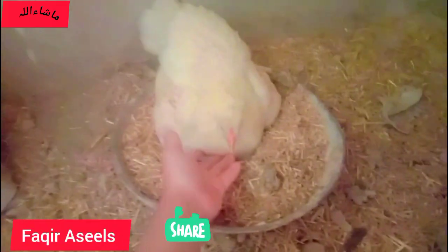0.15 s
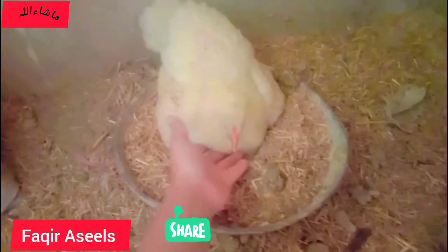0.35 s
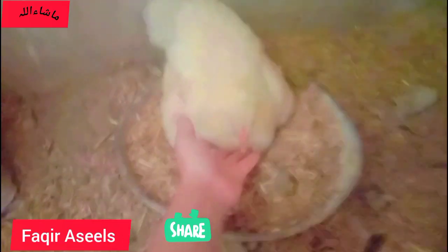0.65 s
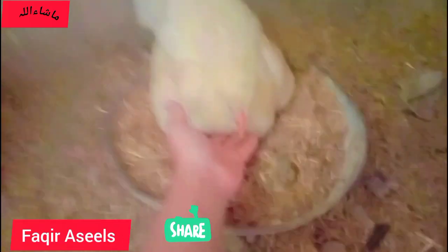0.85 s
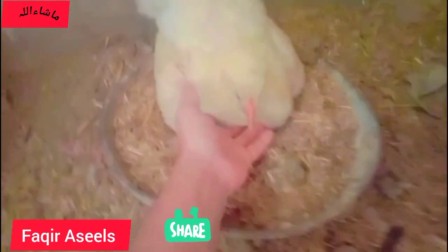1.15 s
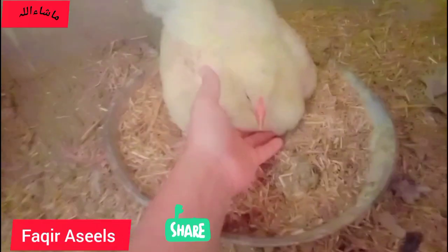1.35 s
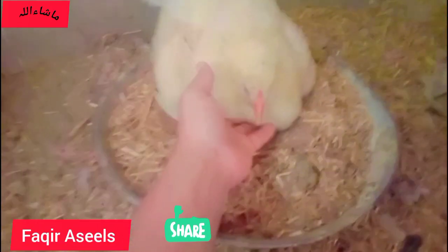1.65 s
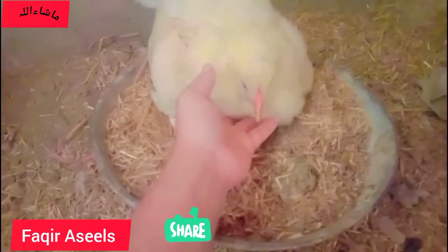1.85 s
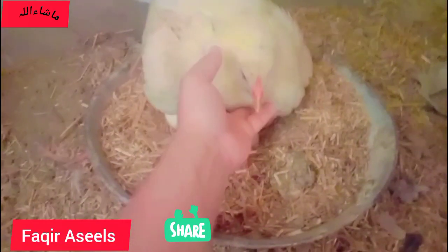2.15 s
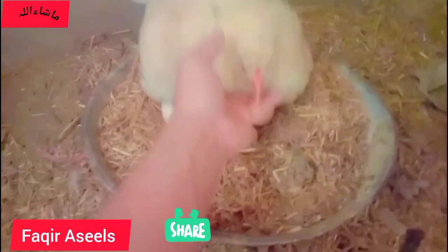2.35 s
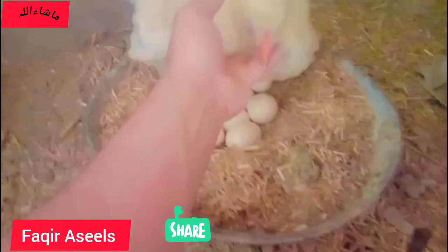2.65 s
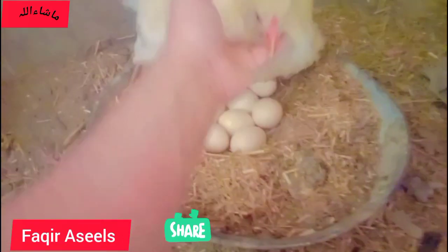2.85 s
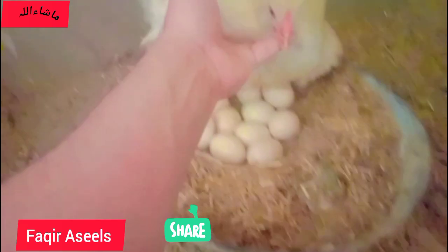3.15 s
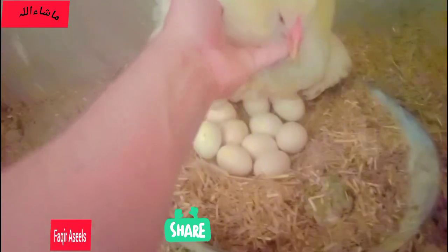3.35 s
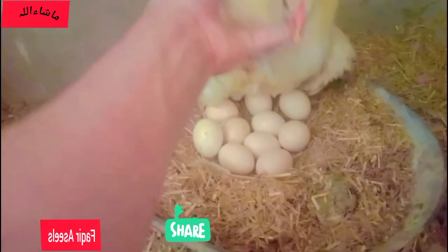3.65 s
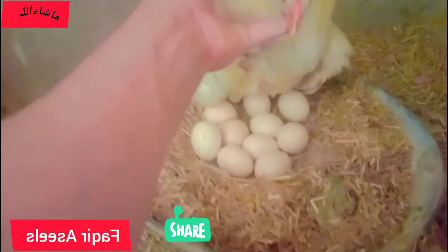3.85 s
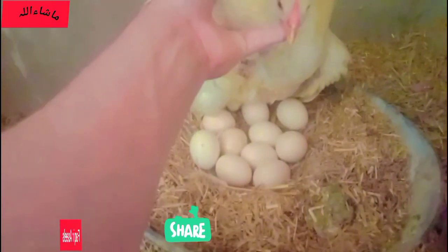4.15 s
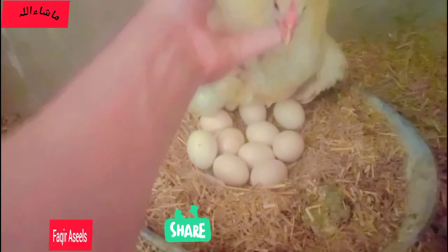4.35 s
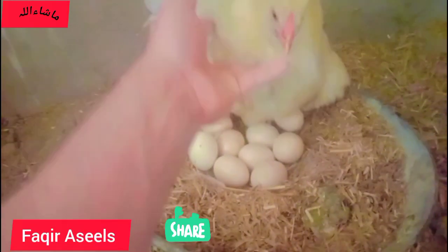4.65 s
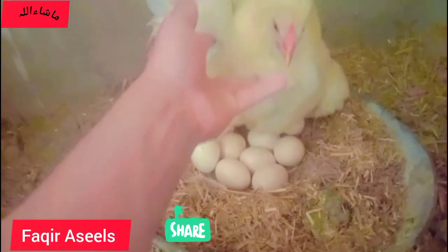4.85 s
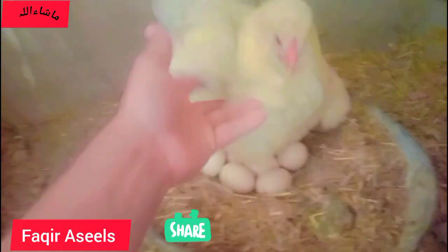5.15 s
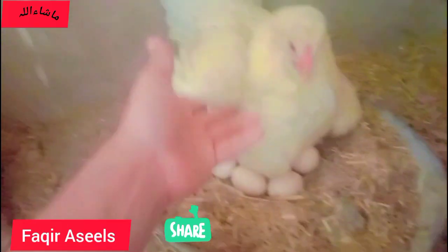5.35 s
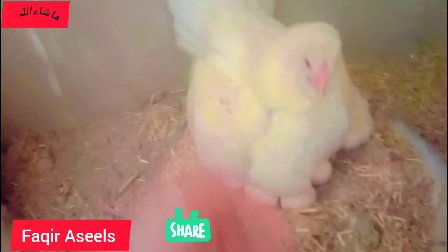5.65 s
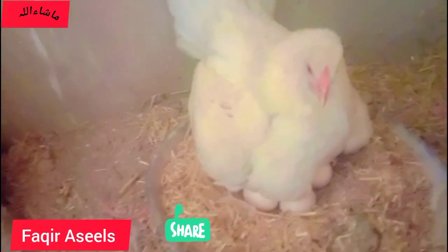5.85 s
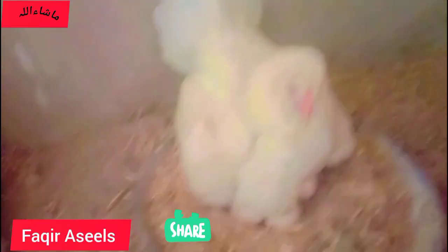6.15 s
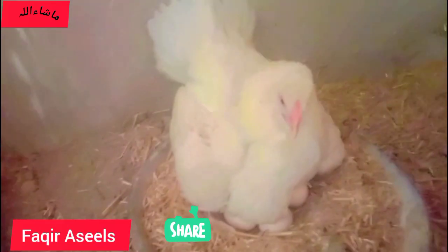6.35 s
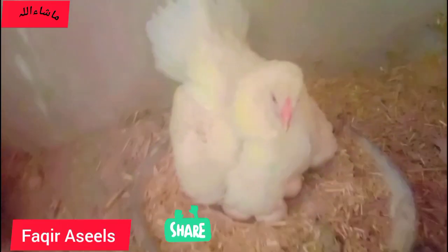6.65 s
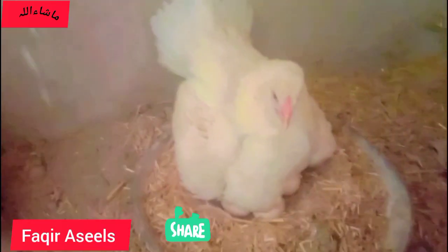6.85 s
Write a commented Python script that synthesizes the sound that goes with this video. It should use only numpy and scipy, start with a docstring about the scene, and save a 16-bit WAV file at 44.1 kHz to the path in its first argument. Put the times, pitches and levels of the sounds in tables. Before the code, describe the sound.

A broody hen close up squawks harshly and rattles off clucks over rustling straw, calms to soft single clucks, then lets out a rising hoarse screech.

```python
"""Broody hen in a small coop

A hen close to the microphone scolds a hand reaching under her: harsh squawks, rattling bursts of clucks,
single soft clucks, hoarse whistles, a low growl and at last a swelling, hissing screech. Her voice is rough
pulses and trembling tones in resonances of throat, chest and beak. Straw rustling, feathers and claws are
shaped noise, bumps on the nest decaying sines; small birds, faint gliding tones, cheep further off."""
import sys
import numpy as np
from scipy import signal
from scipy.fft import rfft, irfft, next_fast_len
from scipy.io import wavfile
from scipy.ndimage import uniform_filter1d, map_coordinates

SR = 44100
rng = np.random.default_rng(int(sys.argv[2]) if len(sys.argv) > 2 else 0)


def inscribe(sig):
    """Save sig as 16-bit PCM at rate SR to the path in sys.argv[1].

    A 1-D sig is mono; a 2-D sig holds one channel per row.
    Samples are clipped to [-1, 1] before scaling.
    """
    pcm = np.round(np.clip(np.atleast_2d(sig).T, -1, 1) * 32767)
    wavfile.write(sys.argv[1], SR, pcm.astype(np.int16))


N = 308391
TIME = np.arange(N) / SR  # s

# Straw under the hand. Loose stalks rub while the hand is under the hen: (t/s, level/dB)
STALKS = [(0, -77), (.3, -53.5), (1.2, -57), (2.6, -56), (3.3, -70), (3.8, -63.5), (4.1, -73.5),
          (4.6, -71.5), (5.1, -64), (5.6, -70), (6.1, -58.5)]
# Strokes through the straw, each a rounded swell: (t/s at its peak, length/s, level/dB)
STROKES = [(0.142, 0.9, -51), (.44, 0.27, -52.5), (0.696, 0.16, -51.5), (1.072, 0.16, -49),
           (1.281, 0.17, -49), (1.443, 0.22, -50), (1.629, 0.16, -53), (1.796, 0.21, -52),
           (1.983, 0.2, -55), (2.28, 0.22, -53.5), (2.469, 0.25, -50), (2.652, 0.3, -53),
           (2.868, 0.24, -54), (3.066, 0.18, -55.5), (3.23, 0.2, -56), (3.462, 0.22, -57),
           (4.93, 0.12, -57.5)]
# Colours of the rubbing stalks and of the brighter rustle: (f/Hz, gain/dB)
STALK_COLOUR = [(500, -25.5), (1500, -2), (2300, -0.5), (3000, 6.5), (3600, 1.5), (4200, -30),
                (7000, -26.5), (8500, -48.5)]
STRAW_COLOUR = [(200, -20), (600, -12.5), (1400, -12), (3200, 7), (4300, -6.5), (5700, 1), (6700, -9),
                (7500, -34.5), (8500, -47), (12000, -33), (16000, -59.5)]
STALK_HISS_DB = -7  # the stalks' brighter hiss against their rubbing

# Low rumble as the arm moves: (t/s, level/dB), and its colour: (f/Hz, gain/dB)
RUMBLE = [(0, -87), (.9, -65.5), (2.9, -67), (3.3, -81.5), (6.99, -70)]
RUMBLE_COLOUR = [(25, -28), (55, 0.5), (90, -5.0), (200, -22.0), (600, -54)]
# Colours of the uneven background air and of a steady treble hiss: (f/Hz, gain/dB)
AIR = [(25, -20), (55, -6), (130, -2), (230, -3.5), (450, -21), (1000, -6.5), (3000, -12), (5500, -15.5),
       (8500, -54.5)]
HISS = [(7000, -34), (11500, -27), (13800, -12), (14500, -2.5), (15500, -5)]

# Harsh clucks, most in rattling bursts: (t/s, length/s, level/dB, pitch f/Hz, throat resonance f/Hz)
HARSH_CLUCKS = [(0.028, 0.016, -22.5, 217.3, 1099), (0.248, 0.026, -35, 427, 840),
                (0.313, 0.038, -32.5, 398.6, 846), (0.362, 0.031, -27.5, 392.7, 830),
                (0.421, 0.034, -26, 390.8, 822), (0.956, 0.026, -30.5, 244.2, 960),
                (1.197, 0.021, -22.5, 233.2, 974), (1.257, 0.018, -19.5, 305.6, 927),
                (1.273, 0.018, -26.5, 279.2, 880), (1.301, 0.019, -19.5, 304, 919),
                (1.321, 0.0093, -18, 314, 910), (1.358, .028, -25, 260.7, 834),
                (1.405, 0.034, -27, 260.6, 840), (1.466, 0.02, -33.5, 375, 880),
                (1.505, 0.028, -32.5, 379, 795), (1.551, .026, -30.5, 241.8, 930),
                (1.88, 0.025, -31.5, 433.3, 928), (2.141, 0.023, -31.5, 217.8, 894),
                (2.188, 0.018, -44, 399, 1100), (2.278, 0.028, -30.5, 224.6, 974),
                (2.335, 0.024, -29, 261.4, 860), (2.384, .017, -20.5, 335.5, 965),
                (2.426, 0.034, -27, 288.8, 860), (2.49, 0.029, -29, 346.4, 757),
                (2.526, 0.027, -28.5, 346.6, 810), (2.813, 0.028, -30, 382.4, 867)]
# Single soft clucks, mostly lower as the hen calms down:
# (t/s, length/s, level/dB, pitch f/Hz, throat resonance f/Hz, roughness 0-1)
SOFT_CLUCKS = [(3.161, 0.021, -37, 398.7, 760, 0.35), (3.46, 0.023, -36, 395.4, 746, 0.34),
               (3.816, .017, -32, 382, 764, 0.25), (4.276, 0.013, -33.5, 344, 690, 0.34),
               (4.563, 0.018, -31, 363.3, 720, 0.15), (4.989, 0.011, -31.5, 334.5, 663, 0.32),
               (5.333, 0.01, -34, 335, 687, 0.47), (5.697, .013, -29, 350, 705, 0.19),
               (6.442, 0.014, -37.5, 334, 680, 0.32), (6.819, 0.012, -33.5, 348, 700, 0.54)]
# Colour of the throat in a cluck, and of the chest: (f/Hz, gain/dB)
CLUCK_COLOUR = [(60, -52), (270, -32), (420, -3.5), (600, 4), (1000, 1.5), (1200, 2), (1390, -5), (1620, 4),
                (1900, 1.5), (2300, 11.5), (3500, 7), (4200, -18), (5200, -7), (7000, -27)]
CHEST_COLOUR = [(50, -46.5), (220, -14), (420, -4.5), (800, -9.5), (2000, -26.0)]
CLEAN_S, ROUGH_PER_S = .0105, 27  # a longer harsh push is rougher: roughness per s beyond the clean length
CHEST_DB, CHEST_FOLLOWS = -41, 0.085  # chest level at a -32 dB harsh cluck; dB per dB of throat level
SOFT_CHEST_DB, CHEST_DB_PER_HZ = -9, 0.11  # soft cluck's chest against its throat at 380 Hz; weaker below
HARSH_BEAK_DB = -20.5  # the beak's ring against the throat
SOFT_BEAK_DB, BEAK_DB_PER_HZ = -16, 0.4364  # the same at 380 Hz; the beak shuts as the pitch sinks
SAC_DB, SAC_HZ, SAC_FADE_DB_PER_HZ = 1, 231, 0.47  # air sac against the chest; fades away from its own pitch
KNOCK_DB, KNOCK_S = -10.5, 0.0024  # bright start against the beak's ring; its decay time to 1/e
HARSH_RISE_SHARE, SOFT_RISE_SHARE = 0.44, 0.43  # share of a cluck's length spent swelling
PITCH_SINK, HARSH_THROAT_SINK, SOFT_THROAT_SINK = .12, 0.025, 0.1  # shares lost over one cluck
LOCK_FROM_DB, LOCK_PER_DB = -26.5, -0.02  # pure-tone share grows below this level (share per dB)

# Squawks: (t/s, length/s, level/dB, throat resonance f/Hz,
# then against the throat: cry level/dB, open-beak level/dB, chest level/dB)
SQUAWKS = [(.172, .045, -35.5, 1321, 0.5, -5, -29), (.487, .047, -27.5, 1352, -0.5, -2.5, -11.5),
           (.544, .045, -38, 1173, 5.5, -6.5, -6), (.622, 0.032, -34, 1269, -1.5, -8.5, -15.5),
           (.692, .024, -41.5, 1268, 1.5, -13, -21.5), (0.756, .033, -34.5, 1255, -8, -13.5, -23),
           (.806, 0.035, -37, 1252, -3.5, -12, -18.5), (.966, .026, -33, 1390, -9.5, -8, -17),
           (1.024, .028, -31, 1329, -4.5, -6, -23.5), (1.096, 0.038, -40.5, 1250, -0.5, -14, -20),
           (1.156, .032, -40, 1173, 0.5, -10.5, -7.5), (6.119, .046, -25.5, 1510, -6.5, -3, -47.5)]
# Colours of the beak and of the open throat: (f/Hz, gain/dB)
BEAK = [(1200, -40.5), (1750, -10), (2100, -1), (2600, -6), (2900, -3), (3400, -2), (3650, -2.5),
        (4000, -27), (5000, -23.5), (6800, -49.5), (8000, -71)]
THROAT_BAND = [(350, -41.5), (600, -8.5), (800, 6), (1600, 10.5), (2400, -16.5), (4000, -7.5),
               (7000, -47.5)]
SQUAWK_RISE_S, SQUAWK_FALL_S = .014, .03
THROAT_CLOSE_SINK, CRY_SINK = 0.081, .13  # shares of their pitch lost over one squawk
THROAT_SWELL_DB, CRY_SWELL_DB, BEAK_SWELL_DB = 8, 3.5, -10  # change over one squawk as the beak closes
CRY_BASE_HZ, CRY_FOLLOWS = 298, .36  # the cry rises with the throat resonance (Hz per Hz)

# The tight throat whistles as a squawk lets go:
# (t/s at its peak, length/s, level/dB, pitch f/Hz, octave level/dB against the tone)
WHISTLES = [(0.222, .03, -36, 1300, -22.5), (0.6, 0.024, -30, 1272, -19), (0.66, .022, -35, 1280, -24),
            (0.73, 0.027, -32.5, 1215, -25), (.918, .056, -31, 1486, -7.5),
            (0.994, .028, -27.5, 1309, -13.5), (1.056, 0.025, -24, 1300, -25.5),
            (1.126, .026, -35, 1229, -26.5), (1.185, 0.033, -33.5, 1145, -25)]
WHISTLE_SINK_PER_S = .7  # share of its pitch lost a second
WHISTLE_WAVER, WHISTLE_FLUTTER_DB = .028, 3.5  # share of the pitch; swing of the level
WHISTLE_HOARSE = .3  # share of the power that is air

# Soft bumps on the nest: (t/s, level/dB, pitch f/Hz)
BUMPS = [(0.958, -33, 188), (2.831, -24, 108.5), (4.379, -35.5, 142.2), (5.025, -34, 160),
         (6.642, -39.5, 120)]

# Small birds further off: (t/s, level/dB before the room in the third column):
# (t/s, length/s, level/dB, start f/Hz, end f/Hz)
CHEEPS = [(1.84, 0.099, -51, 2554, 2790), (1.917, .14, -53.5, 3366, 2994), (4.78, .07, -56.5, 2470, 2616),
          (4.832, 0.072, -57, 3127, 3160), (5.799, .11, -59.5, 3290, 2990)]
CHEEP_WAVER, CHEEP_FLUTTER_DB = .06, 4  # share of the pitch; swing of the level

# Low growl: (t/s, level/dB, pitch f/Hz, hoarse overtones' level/dB against the moan)
GRUMBLE = [(5.045, -61, 300, 6), (5.07, -53.5, 295, 3.5), (5.15, -54.5, 270, -1), (5.21, -47, 238.6, -14.5),
           (5.26, -65.5, 236, -6)]
# Colour of its hoarse overtones: (f/Hz, gain/dB)
GRUMBLE_COLOUR = [(200, -26), (450, -7.5), (650, -2.5), (1150, 2), (1500, -14), (3000, -7), (5000, -55.5)]
THROB_HZ, THROB_START_DB = 31, 10  # throb rate; its swing at the start, dying away by the end

# Colour of feathers on the nest: (f/Hz, gain/dB)
BRUSH_COLOUR = [(60, -43), (210, -6), (500, -13), (800, -8.5), (1350, -8.5), (2300, -23.5), (3700, -16.5),
                (4600, -50), (8000, -72)]
BRUSH_AT_S, BRUSH_DB, BRUSH_ATTACK_S, BRUSH_HOLD_S, BRUSH_FADE_DB_PER_S = 5.264, -50.5, 0.011, 0.084, 81

# Straws snap: (t/s, peak level/dB), and the colour of a snap: (f/Hz, gain/dB)
SNAPS = [(5.277, -51), (5.979, -26)]
SNAP_COLOUR = [(200, -13.0), (1500, 11.5), (3500, 7.5), (6500, -12.0), (8500, -36.5)]

# Claws scratch in the nest basin: (t/s, level/dB)
SCRATCHES = [(5.278, -44), (5.296, -44), (5.311, -40.5), (5.357, -47), (5.408, -53)]
# Resonances of the basin: (f/Hz, level/dB)
BASIN = [(230, 3), (500, 4.5), (780, -1), (1060, 1), (1390, -1)]
BASIN_WIDTH_HZ, SCRATCH_T60_S = 72, 0.018

# Screech: (t/s, throat level/dB, throat resonance f/Hz,
# beak cavity level/dB, beak ring level/dB, broad rasp level/dB)
SCREECH = [(6.18, -40, 1388, -50, -50, -48), (6.22, -38, 1330, -58, -62, -55),
           (6.28, -40.5, 1404, -55.5, -48, -52), (6.43, -45, 1494, -37.5, -40, -44),
           (6.485, -42.5, 1490, -37.5, -34.5, -54), (6.53, -37.5, 1505, -46, -42, -51),
           (6.6, -35.5, 1497, -46, -43.5, -48), (6.67, -39.5, 1489, -47, -39.5, -41.5),
           (6.82, -32, 1510, -36.5, -29, -35), (6.92, -25.5, 1503, -47, -34.5, -34.5),
           (6.99, -26, 1396, -42, -35, -53)]
# The beak's cavity moves during the screech: (t/s, resonance f/Hz)
GAPE = [(6.3, 1840), (6.41, 1990), (6.48, 1680), (6.56, 1596), (6.68, 1825), (6.99, 1735)]
# Rings of the beak: (f/Hz, width/Hz, level/dB)
BEAK_RINGS = [(3200, 203, 3), (3460, 78, -8)]
GAPE_WIDTH_HZ, SCREECH_WIDTH_HZ = 290, 210
SCREECH_GRAIN_DB, WHISTLE_SHARE = 2.2, .25  # swing of the level; share of pure tone in the throat
CRY_DB, SCREECH_LOW_HZ = -6.5, 660  # low cry against the broad rasp; the screech thins out below this

# Decay of the small room: (f/Hz, t60/s)
COOP = [(200, 0.53), (750, 0.22), (3000, 0.51), (8000, 0.12)]
# Early reflections from the coop walls: (delay t/s, level/dB)
WALLS = [(.0065, -23), (0.0127, -15.5), (0.0225, -13.5)]
LOW_CUT_HZ, TOP_HZ = 56, 15600  # the microphone's bass corner; the recorder's band limit


def amp(db):
    """Amplitude factor of a level in dB."""
    return 10 ** (np.asarray(db) / 20)


def unit(x):
    """Scale to rms 1."""
    return x / np.sqrt(np.mean(x ** 2) + 1e-20)


def over(x, length):
    """Scale a call to rms 1 over its length."""
    return x / np.sqrt(np.sum(x ** 2) / (length * SR) + 1e-20)


def along(points, hz):
    """Read (f/Hz, value) points on a log axis."""
    f, v = np.transpose(points)
    return np.interp(np.log(hz + 1), np.log(f + 1), v)


def curves(rows, t=TIME):
    """One value per sample for each column after the time."""
    s, *cols = np.transpose(rows)
    return [np.interp(t, s, c) for c in cols]


def wobble(rate, n):
    """A smooth random curve, rate knots a second."""
    knots = rng.standard_normal(int(n * rate / SR) + 4)
    return map_coordinates(knots, [np.arange(n) * rate / SR])


def add(track, s, x):
    """Mix x into the track at time s."""
    i = max(round(s * SR), 0)
    track[i:i + len(x)] += x[:max(N - i, 0)]


def swell(t, length, rise, fall):
    """Soft gate that opens at 0 and is shut at length."""
    ramp = np.minimum(t / rise, (length - t) / fall)
    return np.sin(np.pi / 2 * np.clip(ramp, 0, 1)) ** 2


def colour(x, points):
    """Causal minimum-phase filter with a (f/Hz, gain/dB) curve, made by folding its cepstrum."""
    m = 2 * next_fast_len(len(x) // 2 + 2048)
    gain_db = along(points, np.fft.rfftfreq(m, 1 / SR))
    cepstrum = irfft(np.log(amp(gain_db)))
    cepstrum[1:m // 2] *= 2
    cepstrum[m // 2 + 1:] = 0
    return irfft(rfft(x, m) * np.exp(rfft(cepstrum)))[:len(x)]


def patchy(x, depth_db, size=5):
    """Small patches of the spectrum swell and fade on their own."""
    z = signal.stft(x, nperseg=512)[2]
    field = rng.standard_normal(z.shape)
    for _ in range(2):
        field = uniform_filter1d(field, size=size // 2, axis=0)
        field = uniform_filter1d(field, size=2 * size, axis=1)
    return signal.istft(z * amp(depth_db * unit(field)), nperseg=512)[1][:len(x)]


def noise(points):
    """Uneven coloured noise of rms 1."""
    return unit(colour(patchy(rng.standard_normal(N), depth_db=2.6), points))


def tone(hz, waver, rate):
    """Phase of an oscillation whose pitch trembles at random."""
    return 2 * np.pi * np.cumsum(hz * (1 + waver * wobble(rate, len(hz)))) / SR


def resonance(x, hz, width_hz):
    """A one-pole resonance whose centre may move: shift down, smooth, shift back up."""
    turn = np.exp(2j * np.pi * np.cumsum(hz * np.ones(len(x))) / SR)
    ring = signal.lfilter([1], [1, -np.exp(-np.pi * width_hz / SR)], x / turn)
    return (turn * ring).imag


def peak(x, hz, width_hz):
    """A resonance with steep skirts, at rms 1."""
    return unit(resonance(resonance(x, hz, width_hz), hz, 2 * width_hz))


def syrinx(pitch_hz, rough, jitter=0.32, scatter_db=4, air=1.0):
    """Pulses of the membranes; roughness upsets their timing and size and lets air rush through."""
    n = len(pitch_hz)
    cycle = np.cumsum(pitch_hz * np.exp(jitter * rough * wobble(300, n))) / SR
    pulses = np.diff(np.floor(cycle), prepend=0) * amp(scatter_db * rough * wobble(250, n))
    rush = rng.standard_normal(n) * np.exp(-2 * (cycle % 1))  # strongest just after each pulse
    return unit(pulses - pulses.mean()) + air * rough * unit(rush)


def straw():
    """Stalks rub as coloured noise; each stroke of the hand swells into a brighter rustle."""
    rubbing = amp(curves(STALKS)[0])
    strokes = sum(amp(db) * np.exp(-(3.28 * (TIME - s) / length) ** 2) for s, length, db in STROKES)
    rustle_level = np.hypot(strokes, amp(STALK_HISS_DB) * rubbing)
    rustle = rustle_level * amp(1.2 * wobble(120, N)) * noise(STRAW_COLOUR)
    unsteady_db = 2.6 * wobble(70, N) + 0.79 * wobble(10, N)
    return rustle + rubbing * amp(unsteady_db) * noise(STALK_COLOUR)


def arm_rumble():
    """Low noise that follows the moving arm."""
    return amp(curves(RUMBLE)[0]) * noise(RUMBLE_COLOUR)


def background():
    """Slowly wavering air in the coop, with a steady treble hiss."""
    air = amp(-68.5 + wobble(1.5, N)) * noise(AIR)
    return air + amp(-68) * unit(colour(rng.standard_normal(N), HISS))


def cluck(length, db, pitch_hz, throat_hz, rough, chest_db, beak_db, rise_share, throat_sink):
    """A short train of pulses rings throat, chest and beak; pitch and throat sink as the push ends."""
    t = np.arange(int((length + .03) * SR)) / SR
    sink = .5 - np.clip(t / length, 0, 1)
    gate = swell(t, length + .0028, rise=rise_share * length, fall=0.0027)
    push = syrinx(pitch_hz * (1 + PITCH_SINK * sink), rough) * gate
    # throat: ringing pulses, part of them replaced by a pure tone
    bent_hz = throat_hz * (1 + throat_sink * sink)
    ring = resonance(push, bent_hz, 110 + 200 * rough)
    pulsed = colour(resonance(ring, throat_hz * 1.503, 900), CLUCK_COLOUR)
    core_gate = swell(t - .002, length + .003, rise=length / 2, fall=length / 2)
    core = np.sin(tone(bent_hz, waver=0.014, rate=420)) * core_gate
    locked = np.clip(LOCK_PER_DB * (db - LOCK_FROM_DB), 0, .7)
    throat = np.sqrt(1 - locked) * unit(pulsed) + np.sqrt(locked) * unit(core)
    # chest: the body and its air sac
    sac_db = SAC_DB - SAC_FADE_DB_PER_HZ * abs(pitch_hz - SAC_HZ)
    body = colour(resonance(push, 415, 50), CHEST_COLOUR)
    chest = unit(body) + amp(sac_db) * peak(push, SAC_HZ, 79)
    beak = resonance(resonance(push, 1180, 350), 1180, 620)
    # the beak is wide open at the start and lets a brighter knock out
    knock = resonance(resonance(push * np.exp(-t / KNOCK_S), 1400, 660), 1300, 640)
    bill = over(beak, length) + amp(KNOCK_DB) * over(knock, length)
    voice = over(throat, length) + amp(beak_db) * bill
    return amp(db) * voice + amp(chest_db) * over(chest, length)


def clucks():
    """Harsh clucks grow rougher with their length; in soft ones the throat, near the octave of the pitch, bends
    down a little."""
    out = np.zeros(N)
    for s, length, db, pitch_hz, throat_hz in HARSH_CLUCKS:
        rough = np.clip(ROUGH_PER_S * (length - CLEAN_S), .2, .7)
        chest_db = CHEST_DB + CHEST_FOLLOWS * (db + 32.0)
        call = cluck(length, db, pitch_hz, throat_hz, rough, chest_db,
                     HARSH_BEAK_DB, HARSH_RISE_SHARE, HARSH_THROAT_SINK)
        add(out, s - .001, call)
    for s, length, db, pitch_hz, throat_hz, rough in SOFT_CLUCKS:
        beak_db = SOFT_BEAK_DB + BEAK_DB_PER_HZ * (pitch_hz - 380)
        chest_db = db + SOFT_CHEST_DB + CHEST_DB_PER_HZ * (pitch_hz - 380)
        call = cluck(length, db, pitch_hz, throat_hz, rough, chest_db,
                     beak_db, SOFT_RISE_SHARE, SOFT_THROAT_SINK)
        add(out, s - .001, call)
    return out


def rasp(push, gate, hz, width_hz, pure):
    """One voice of the open throat: rough pulses in a resonance, and a share (pure) of trembling tone."""
    clean = np.sin(tone(hz, waver=.024, rate=280)) * amp(4 * wobble(200, len(push)))
    harsh = colour(resonance(push * gate, hz, width_hz), THROAT_BAND)
    return np.sqrt(pure) * unit(clean * gate) + np.sqrt(1 - pure) * unit(harsh)


def squawks():
    """Hard, chaotic pulses with the beak flung open; the sound sinks and darkens as it closes."""
    out = np.zeros(N)
    for s, length, db, throat_hz, cry_db, beak_db, chest_db in SQUAWKS:
        t = np.arange(int((length + .04) * SR)) / SR
        closing = np.clip(t / length, 0, 1) - .5
        push = syrinx(260 * (1 - .24 * closing), rough=.85)
        gate = swell(t, length + 0.023, rise=SQUAWK_RISE_S, fall=SQUAWK_FALL_S)
        voiced = np.clip((db + 40) / 17, .1, .9)  # the harder the push, the clearer the cry and beak's ring
        throat = rasp(push, gate, throat_hz * (1 - THROAT_CLOSE_SINK * closing), width_hz=310, pure=0.27)
        cry_hz = CRY_BASE_HZ + CRY_FOLLOWS * throat_hz
        cry = rasp(push, gate, cry_hz * (1 - CRY_SINK * closing), width_hz=140, pure=voiced)
        beak = unit(colour(push * gate, BEAK)) + voiced * amp(2) * peak(push * gate, 3070, 130)
        voice = (over(throat * amp(THROAT_SWELL_DB * closing), length)
                 + amp(cry_db) * over(cry * amp(CRY_SWELL_DB * closing), length)
                 + amp(beak_db) * over(beak * amp(BEAK_SWELL_DB * closing), length)
                 + amp(chest_db) * over(peak(push * gate, 450, 90), length))
        add(out, s - .005, amp(db) * voice)
    return out


def whistles():
    """The throat stays tight after a squawk and sings hoarsely on its resonance, sinking a little each time."""
    out = np.zeros(N)
    for s, length, db, hz, octave_db in WHISTLES:
        t = np.arange(-int(length * SR), int(length * SR)) / SR
        pitch_hz = hz * (1 - WHISTLE_SINK_PER_S * t)
        phase = tone(pitch_hz, waver=WHISTLE_WAVER, rate=380)
        flutter = amp(WHISTLE_FLUTTER_DB * wobble(220, len(t)))
        clean = unit((np.sin(phase) + amp(octave_db) * np.sin(2 * phase)) * flutter)
        breath = resonance(rng.standard_normal(len(t)), pitch_hz, SCREECH_WIDTH_HZ)
        air = unit(colour(breath, THROAT_BAND))
        voice = np.sqrt(1 - WHISTLE_HOARSE) * clean + np.sqrt(WHISTLE_HOARSE) * air
        add(out, s - length, amp(db) * voice * np.exp(-(2 * t / length) ** 2))
    return out


def bumps():
    """The bedding takes dull bumps: low sines with a quick start that die by 60 dB in 40 ms."""
    out = np.zeros(N)
    t = np.arange(SR // 8) / SR
    for s, db, hz in BUMPS:
        thud = np.sin(2 * np.pi * hz * t) * (1 - np.exp(-t / 0.0011)) * amp(-60 * t / 0.04)
        add(out, s, amp(db) * thud)
    return out


def cheeps():
    """Thin wavering glides of small birds some way off."""
    out = np.zeros(N)
    for s, length, db, start_hz, end_hz in CHEEPS:
        t = np.arange(int(length * SR)) / SR
        glide_hz = np.interp(t, [0, length], [start_hz, end_hz])
        phase = tone(glide_hz, waver=CHEEP_WAVER, rate=530)
        level = amp(db + CHEEP_FLUTTER_DB * wobble(120, len(t)))
        add(out, s, level * np.sin(phase) * swell(t, length, rise=0.023, fall=0.014))
    return out


def grumble():
    """A low growl: hoarse pulses over a throbbing tone at first, sinking into a smoother moan."""
    out = np.zeros(N)
    t = TIME[int(GRUMBLE[0][0] * SR):int(GRUMBLE[-1][0] * SR)]
    db, pitch_hz, hoarse_db = curves(GRUMBLE, t)
    swing_db = np.linspace(-THROB_START_DB, 0, len(t))
    throb_db = swing_db * np.cos(2 * np.pi * THROB_HZ * (t - t[0]))
    moan = unit(np.sin(tone(pitch_hz, waver=.07, rate=170)) * amp(throb_db))
    hoarse = unit(colour(syrinx(pitch_hz, rough=0.58), GRUMBLE_COLOUR))
    add(out, t[0], amp(db) * (moan + amp(hoarse_db) * hoarse))
    return out


def brush():
    """Feathers sweep over the nest as the hen settles: coloured noise, held and then fading."""
    t = np.maximum(TIME - BRUSH_AT_S, 0)
    db = BRUSH_DB - BRUSH_FADE_DB_PER_S * np.maximum(t - BRUSH_HOLD_S, 0)
    attack = np.minimum(t / BRUSH_ATTACK_S, 1)
    return attack * amp(db + 1.8 * wobble(130, N)) * noise(BRUSH_COLOUR)


def snaps():
    """Straws snap: coloured noise that dies by 60 dB in 6.5 ms."""
    out = np.zeros(N)
    t = np.arange(SR // 8) / SR
    for s, db in SNAPS:
        crack = colour(rng.standard_normal(len(t)) * amp(-60 * t / 0.0065), SNAP_COLOUR)
        add(out, s, amp(db) * crack / np.abs(crack).max())
    return out


def scratches():
    """Each catch of a claw is a short burst that rings the padded basin."""
    out = np.zeros(N)
    t = np.arange(SR // 16) / SR
    for s, db in SCRATCHES:
        catch = rng.standard_normal(len(t)) * amp(-60 * t / SCRATCH_T60_S)
        ring = sum(amp(mode_db) * peak(catch, hz, BASIN_WIDTH_HZ) for hz, mode_db in BASIN)
        add(out, s - .001, amp(db) * over(ring, 0.0044))
    return out


def screech():
    """A long hoarse threat: mostly stuttering air through the same throat and beak, growing louder."""
    t = TIME[int(SCREECH[0][0] * SR):]
    throat_db, throat_hz, gape_db, ring_db, rasp_db = curves(SCREECH, t)
    gape_hz, = curves(GAPE, t)
    push = patchy(syrinx(np.full(len(t), 300.), rough=.9, scatter_db=5, air=1.9), depth_db=3.5)
    push = push * amp(SCREECH_GRAIN_DB * wobble(170, len(t)))
    throat = rasp(push, 1, throat_hz, SCREECH_WIDTH_HZ, pure=WHISTLE_SHARE)
    cavity = peak(push, gape_hz, GAPE_WIDTH_HZ)
    ring = unit(sum(amp(db) * peak(push, hz, width_hz) for hz, width_hz, db in BEAK_RINGS))
    broad = unit(colour(push, BEAK)) + amp(CRY_DB) * peak(push, 769, 110)
    voice = (amp(throat_db) * throat + amp(gape_db) * cavity
             + amp(ring_db) * ring + amp(rasp_db) * broad)
    low_cut = signal.butter(2, SCREECH_LOW_HZ, "high", fs=SR, output="sos")
    voice = signal.sosfilt(low_cut, voice)
    out = np.zeros(N)
    add(out, t[0], voice * swell(t - t[0], t[-1] - t[0], rise=.005, fall=.005))
    return out


def coop(x):
    """The diffuse ring of the small room: decaying noise that sets in after 10 ms."""
    hz, t, z = signal.stft(rng.standard_normal(SR // 2), SR, nperseg=256)
    decay = amp(-60 * t / along(COOP, hz)[:, None])
    tail = signal.istft(z * decay, SR, nperseg=256)[1]
    return signal.fftconvolve(x, np.pad(tail / np.linalg.norm(tail), (SR // 100, 0)))[:N]


def scene():
    """The hen is close and nearly dry; the cheeps arrive only by way of the room."""
    hen = clucks() + squawks() + whistles() + grumble() + screech()
    nest = straw() + bumps() + brush() + snaps() + scratches()
    out = hen + amp(-19.0) * coop(hen) + nest + amp(4.0) * coop(cheeps())
    for delay, db in WALLS:
        add(out, delay, amp(db) * hen)
    return (out + arm_rumble() + background())[None]


def record(dry):
    """The microphone thins the deepest bass; the recorder keeps nothing above its band limit."""
    low_cut = signal.butter(3, LOW_CUT_HZ, "high", fs=SR, output="sos")
    thinned = signal.sosfilt(low_cut, dry)
    return irfft(rfft(thinned) * (np.fft.rfftfreq(N, 1 / SR) < TOP_HZ), N)


dry = scene()
out = record(dry)
inscribe(out)
```